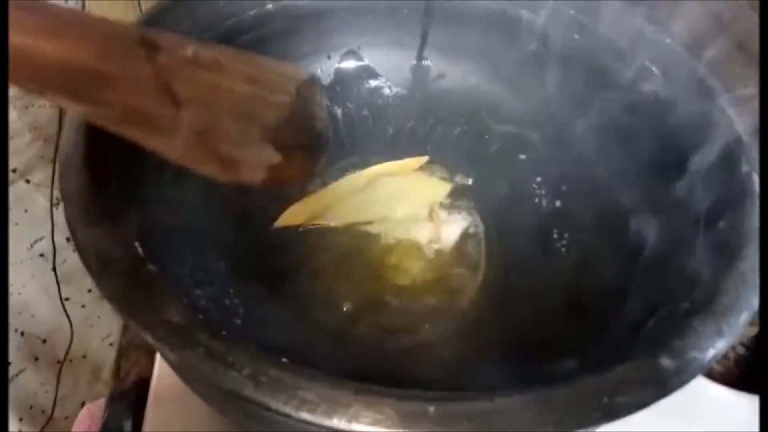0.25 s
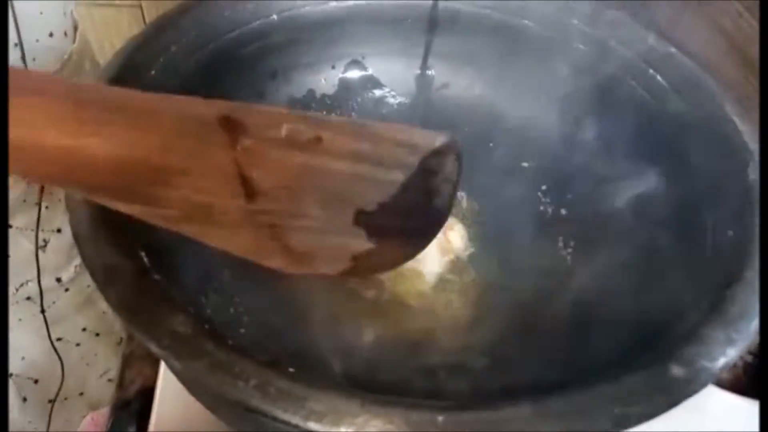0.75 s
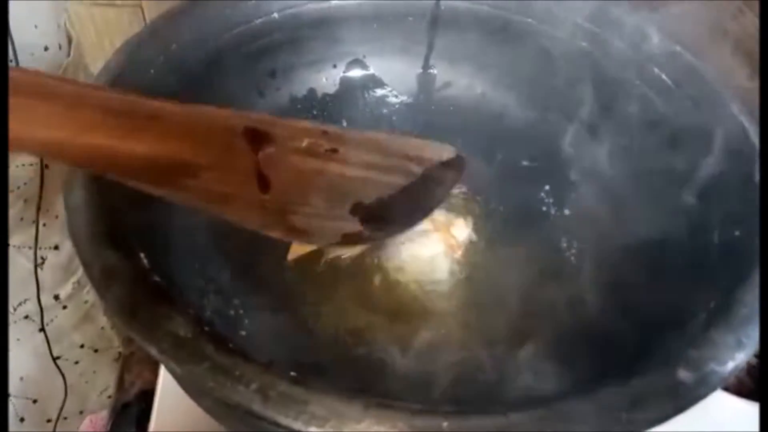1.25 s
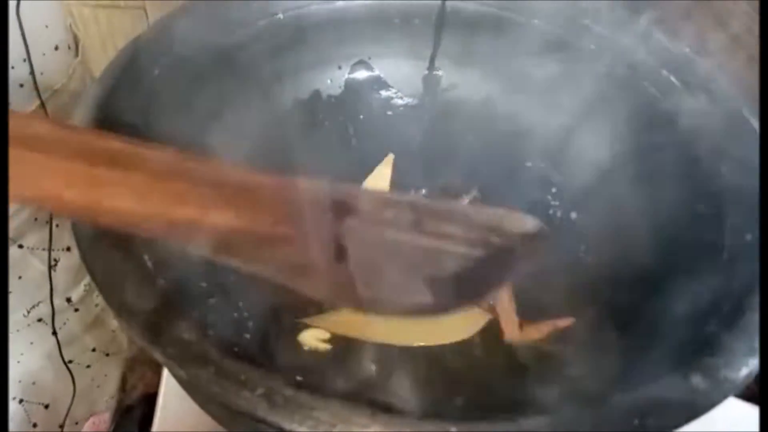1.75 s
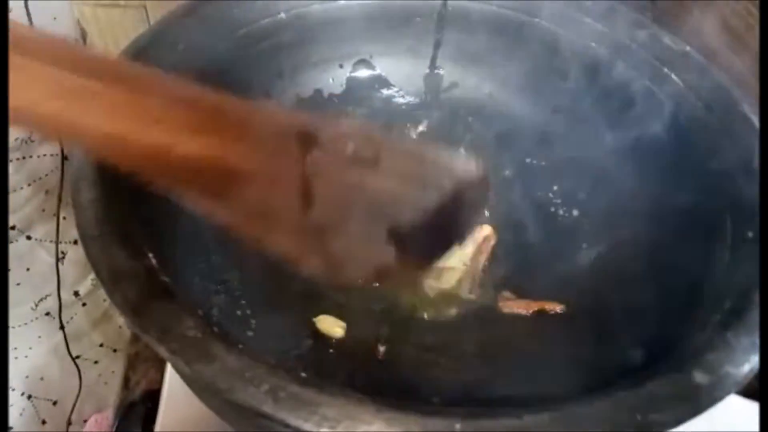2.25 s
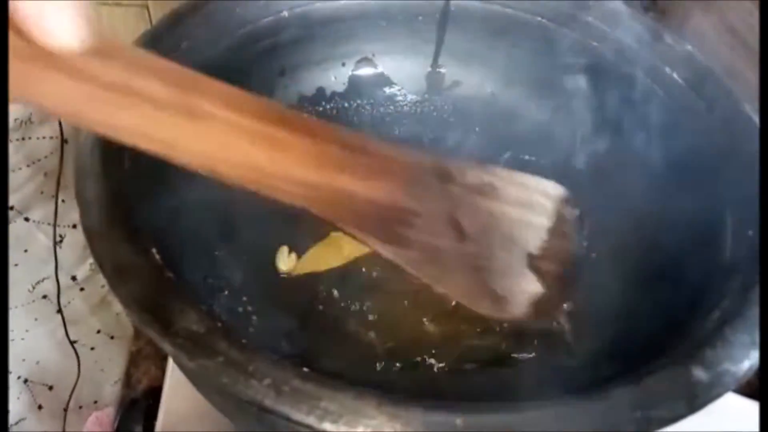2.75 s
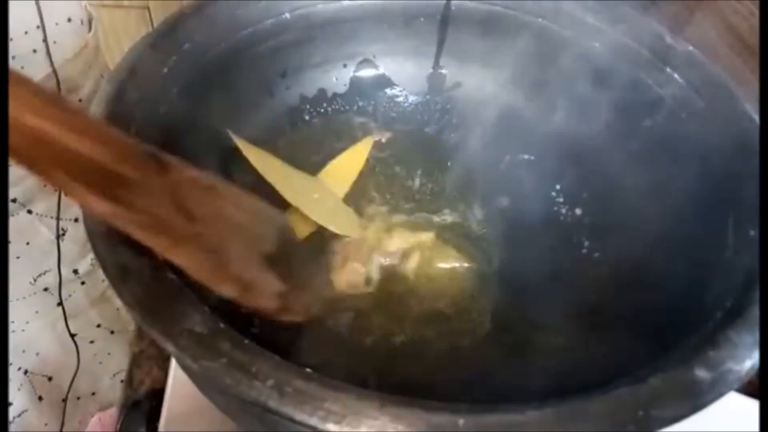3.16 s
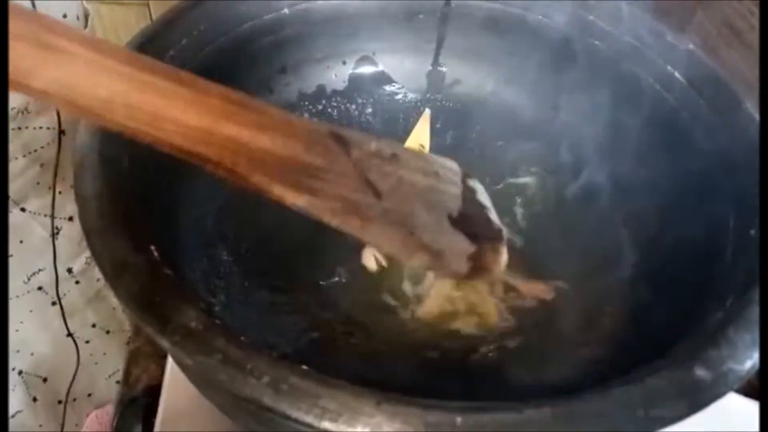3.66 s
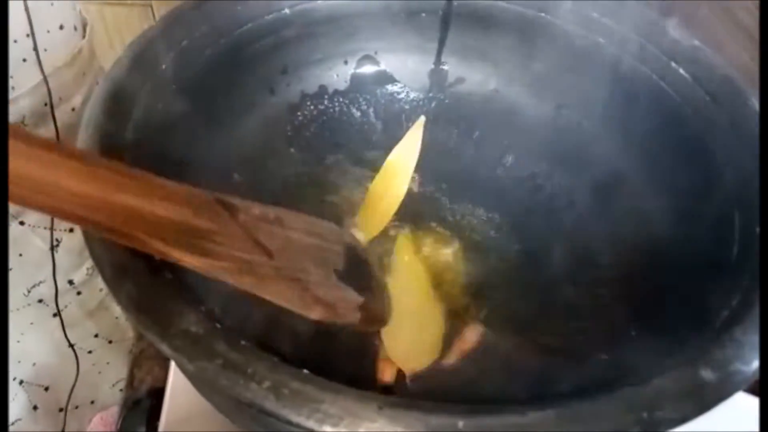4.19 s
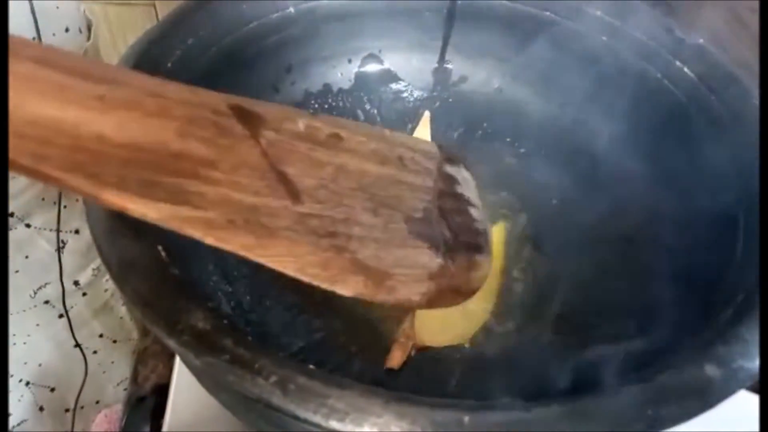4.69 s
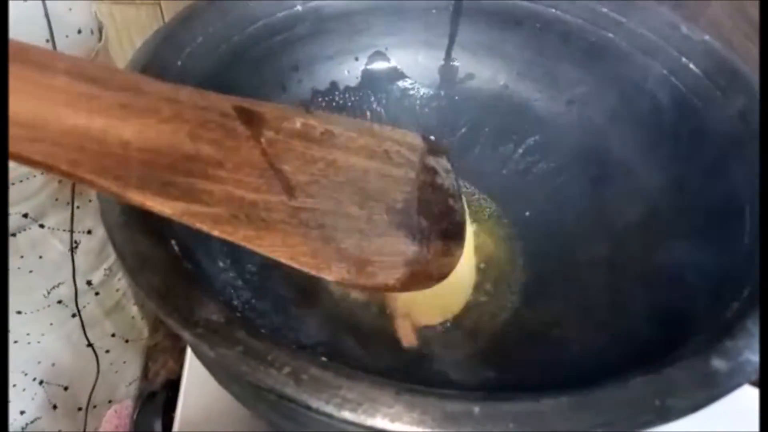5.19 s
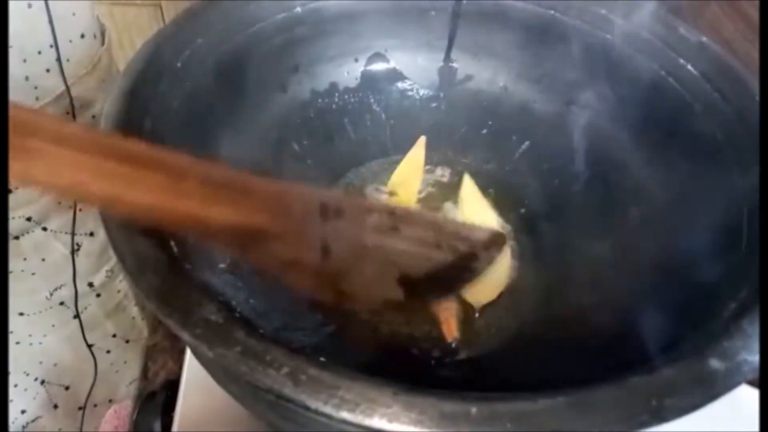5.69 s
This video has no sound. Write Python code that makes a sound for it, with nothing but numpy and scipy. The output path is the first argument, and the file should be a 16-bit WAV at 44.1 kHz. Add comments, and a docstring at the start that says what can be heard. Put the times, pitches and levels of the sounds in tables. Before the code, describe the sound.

Hot oil pops and spits over a fine sizzle as a wooden spatula stirs whole spices in a clay pot, heard up close.

```python
"""Spices frying in a clay pot

Whole spices fry in hot oil, heard from close above by two microphone ports. Steam bubbles burst in pitched
pops that bounce between the pot walls and die away in the kitchen. A wooden spatula knocks and scrapes
on the clay. A fine sizzle and a low rumble lie underneath; gain control ducks around loud pops."""
import sys
import numpy as np
from scipy import signal
from scipy.fft import rfft, irfft, next_fast_len
from scipy.io import wavfile
from scipy.ndimage import uniform_filter1d

SR = 44100
rng = np.random.default_rng(int(sys.argv[2]) if len(sys.argv) > 2 else 0)


def dump_mix(stems):
    """Bounce the given channels to the path in sys.argv[1] as a 16-bit WAV at rate SR."""
    frames = np.atleast_2d(stems).T  # one column per channel
    limited = np.clip(frames, -1, 1)  # hard clip at full scale
    pcm = np.round(limited * 32767).astype(np.int16)
    wavfile.write(sys.argv[1], SR, pcm)


N = 261733

# Loud steam bubbles. Each row: start in seconds, level in dB, pitch in Hz, snap in dB.
# Snap drives the bright edge above 11 kHz; more snap is a drier burst.
LOUD_POPS = [(0.0024, -14, 2730, -34.5), (0.0392, -9, 2860, -71), (0.0675, -11.5, 3740, -60),
             (0.0824, -12, 1390, -48), (0.112, -18.5, 4220, -45), (0.186, -15, 2650, -38),
             (0.199, -13.5, 4060, -39), (0.2515, -11.5, 3550, -58), (0.2732, -10, 2870, -57),
             (0.319, -21, 3970, -21), (0.3707, -15.5, 4150, -23), (0.4535, -18, 3670, -25),
             (0.4606, -13, 1580, -43), (0.527, -25, 1520, -41), (0.536, -17.5, 4180, -53),
             (0.5785, -13, 4030, -58), (0.695, -14, 4160, -84), (0.703, -13.5, 3210, -75),
             (0.736, -14.5, 2820, -36), (0.9869, -18.5, 5100, -36), (1.129, -11, 3340, -75),
             (1.1927, -11.5, 3200, -25.5), (1.2529, -17, 3440, -24), (1.271, -16, 3930, -49),
             (1.3025, -16.5, 3680, -61), (1.3928, -14, 3960, -65), (1.431, -21.5, 2870, -56),
             (1.4622, -9, 3380, -76), (1.493, -15.5, 2390, -76), (1.5308, -6, 2195, -76),
             (1.6567, -19, 2260, -46), (1.7117, -21.5, 4100, -44), (1.7396, -12.5, 3480, -44),
             (1.7633, -20, 4160, -40), (1.8833, -19.5, 2670, -38), (1.9053, -10.5, 3600, -65),
             (1.9651, -22, 5170, -45), (2.079, -10.5, 2880, -51), (2.1057, -14.5, 4300, -29),
             (2.2256, -16.5, 3160, -28), (2.2895, -13, 4350, -50), (2.299, -21.5, 4180, -28),
             (2.348, -11, 4000, -71), (2.364, -17.5, 4050, -32), (2.3922, -20, 1800, -47),
             (2.43, -15, 4440, -46), (2.5015, -15, 4340, -38), (2.5595, -12.5, 3450, -68),
             (2.587, -23.5, 2440, -48), (2.655, -19, 4170, -49), (2.684, -17.5, 4020, -41),
             (2.7023, -21.5, 3780, -32), (2.7419, -23.5, 3940, -19.5), (2.8455, -17, 4340, -34),
             (2.855, -14, 3570, -27), (2.865, -18.5, 3880, -26), (2.946, -12, 4420, -78),
             (2.9697, -24.5, 5000, -36), (2.99, -14.5, 4640, -45), (3.052, -21.5, 3840, -39),
             (3.0768, -14.5, 4200, -28), (3.1005, -15, 2980, -34), (3.157, -22, 2070, -53),
             (3.199, -19.5, 2180, -40), (3.2986, -14, 2500, -44), (3.4017, -17.5, 4890, -39),
             (3.453, -11, 2810, -26), (3.472, -19, 3200, -40), (3.4835, -15, 4330, -22.5),
             (3.515, -20, 3330, -39), (3.575, -18, 4670, -28), (3.603, -10.5, 2670, -41),
             (3.6818, -13.5, 3930, -53), (3.706, -10.5, 3180, -56), (3.7574, -21, 4350, -40),
             (3.813, -8, 1740, -100), (3.8452, -13.5, 3670, -64), (3.8585, -11.5, 3870, -41),
             (4.0478, -21, 1450, -34), (4.0784, -15.5, 4000, -19.5), (4.1937, -7.5, 1390, -43),
             (4.239, -8.5, 3920, -43), (4.2731, -11.5, 2600, -59), (4.3098, -17.5, 3630, -66),
             (4.339, -18, 2600, -34), (4.391, -23.5, 3050, -45), (4.4424, -22, 3000, -52),
             (4.514, -13.5, 1550, -43), (4.6133, -13, 4130, -20), (4.8804, -16, 3830, -77),
             (4.9485, -13.5, 4020, -39.5), (5.2752, -14.5, 3530, -45), (5.3355, -17, 3550, -47),
             (5.4083, -13.5, 2880, -47), (5.4453, -17, 3840, -72), (5.492, -26.5, 4280, -45),
             (5.5421, -15.5, 3630, -59), (5.6313, -12, 1840, -43), (5.65, -11, 3380, -52),
             (5.6689, -9, 2430, -91), (5.7195, -10, 2900, -49), (5.8645, -38, 2500, -10)]
# Dry oil spits, one sharp spike each. Each row: start in seconds, level in dB, pitch in Hz, snap in dB.
OIL_SPITS = [(0.4801, -13, 4260, -26), (1.368, -16.5, 4710, -58), (1.841, -15, 4530, -33.5),
             (1.9883, -19, 4200, -22.5), (2.1607, -10, 3700, -32.5), (2.6279, -17, 3860, -23.5),
             (2.7935, -17, 4180, -83), (4.0072, -23.5, 4170, -21), (4.721, -13, 3880, -98),
             (5.924, -28, 3970, -19.5)]
# Steam whistling out of a spice. Each row: start in seconds, length in seconds, pitch in Hz, level in dB.
STEAM_JETS = [(0.268, 0.047, 3000, -22.5), (1.532, 0.125, 2100, -29.5), (3.836, 0.062, 3980, -24.5),
              (4.276, 0.11, 2680, -31.5), (4.515, 0.034, 2170, -24), (5.682, 0.14, 2660, -30.5)]
# Spatula and spices hitting the pot. Each row: start in seconds, level in dB, relative clay drive in dB.
POT_KNOCKS = [(0.081, -21.5, -32), (0.462, -21, -37), (1.658, -16, -34), (1.763, -23.5, -27),
              (2.386, -25.5, -30.5), (2.561, -15.5, -18.5), (2.673, -8, -36.5), (3.156, -14, -29.5),
              (3.201, -17.5, -36), (3.813, -20.5, -42), (4.049, -19, -44), (4.194, -14.5, -34.5),
              (4.434, -23, -30), (4.513, -18, -36), (5.631, -23.5, -33)]
# Modes of the pot. Each row: frequency in Hz, gain in dB, T60 in seconds.
CLAY_MODES = [(242, 4, .2), (412, 7, 0.094), (650, 11, 0.17), (1134, 0, 0.06)]
# Spatula dragging spices over clay. Each row: start in seconds, length in seconds, level in dB.
SPATULA_STROKES = [(3.102, .11, -29.5), (4.415, 0.043, -35), (4.778, .03, -29)]
# Envelope of the tiny bubbles. Each row: time in seconds, fizz level in dB, spray level in dB.
SIZZLE_LEVELS = [(0.0, -39, -73), (0.51, -39, -56.5), (1.02, -44.5, -72.5), (1.37, -56.5, -65),
                 (1.67, -39, -86), (1.96, -40, -61), (3.48, -46.5, -75), (3.57, -41, -58.5),
                 (4.31, -38, -67.5), (5.17, -53.5, -76), (5.55, -45, -90), (5.93, -51, -70)]
# Flame and house rumble. Each row: frequency in Hz, relative spectral density in dB.
RUMBLE_SPECTRUM = [(30, -16), (130, 8.5), (300, -10.5), (780, -23), (1500, -35)]
# Rumble envelope. Each row: time in seconds, gain in dB.
RUMBLE_GAINS = [(0, -55.5), (4, -54), (5.2, -49.5), (5.93, -48.5)]
# Wavering hums. Each row: frequency in Hz, width in Hz, level in dB re the rumble noise.
RUMBLE_HUMS = [(157.1, 9.6, -7.5), (410, 63, -9.5), (645, 48, -15.5)]
# Right port response. Each row: frequency in Hz, gain in dB re the left port.
RIGHT_PORT_EQ = [(140, -8.5), (310, -2), (600, -6.5), (1000, -4.5), (1450, -7.5), (2500, -10.5),
                 (3500, -8.5), (5000, -4), (7500, 1), (11000, -1), (14500, -6)]

ECHO_SAMPLES = 1500
REFERENCE_SNAP_DB = -21


def pops():
    """Bursting bubbles and oil spits with their wall bounces; returns body and bright snap."""
    body, snap = np.zeros((2, 2, N + ECHO_SAMPLES))
    click = np.zeros((2, ECHO_SAMPLES))
    click[:, 0] = 1
    for row in OIL_SPITS + LOUD_POPS + small_pops():
        start_s, level_db, hz, snap_db = row
        at = round(start_s * SR)
        dryness_db = snap_db - REFERENCE_SNAP_DB
        bounce_db = -4 if row in OIL_SPITS else 4 - 0.11 * dryness_db
        echoes = wall_echoes(per_s=6000, t60_s=0.032, bounce_db=bounce_db)
        body[:, at:at + ECHO_SAMPLES] += amp(level_db) * bubble_burst(echoes, hz, dryness_db)
        edge = amp(level_db + snap_db) * (click + amp(-8.5) * (echoes - click))
        edge[1] = np.roll(edge[1], rng.integers(0, 5))   # own place between the ports
        snap[:, at:at + ECHO_SAMPLES] += edge
    pot_air = amp(1.5) * band(body[:, :N], 521, 720, order=4)
    body = amp(7.5) * band(body[:, :N], 1200, 8800, order=5)
    snap = amp(30.5) * band(snap[:, :N], 11060, 21000)
    droplets = amp(-8.5) * kitchen_tail(snap, t60_s=0.28, cutoff_hz=15000)
    return body + pot_air, snap + droplets


def bubble_burst(echoes, hz, dryness_db, energy_s=0.0006):
    """A short ring, a broad crack and an unpitched spike, at fixed energy. Wet bursts ring narrower."""
    width_hz = (hz / 5 + 260) * amp(0.027 * dryness_db)
    ring = unit_peak(resonate_twice(echoes, hz, width_hz))
    crack = amp(2 + 0.49 * dryness_db) * unit_peak(resonate_twice(echoes, 1.423 * hz, 0.5 * hz))
    spike = amp(-7.5 + 0.18 * dryness_db) * unit_peak(resonate_twice(echoes, hz=3200, width_hz=2450))
    return unit_energy(unit_peak(ring + crack) + spike) * np.sqrt(energy_s * SR)


def small_pops(per_s=48, centre_hz=3730, spread_octaves=0.38):
    """Random rows for small bubbles; their level follows the sizzle."""
    starts_s = np.cumsum(rng.exponential(1, 800)) / per_s
    inside = starts_s < N / SR
    level_draw, pitch_draw, snap_draw = rng.standard_normal((800, 3))[inside].T
    starts_s = starts_s[inside]
    fizz_db = envelopes(SIZZLE_LEVELS)[0]
    level_db = fizz_db[(starts_s * SR).astype(int)] + 11 + 3 * level_draw
    hz = np.clip(centre_hz * 2 ** (spread_octaves * pitch_draw), 1500, 6500)
    snap_db = -44 + 4 * snap_draw
    return list(zip(starts_s, level_db, hz, snap_db))


def steam_jets(fade_db=6):
    """Sputtering noise in one resonance, fading as the steam runs out."""
    out, t = np.zeros((2, N)), np.arange(N) / SR
    for start_s, length_s, hz, level_db in STEAM_JETS:
        span = (t > start_s) & (t < start_s + length_s)
        sputter = rng.standard_normal((2, span.sum())) * amp(4.1 * rng.standard_normal(span.sum()))
        whistle = unit_rms(resonate_twice(sputter, hz, hz / 5.5))
        out[:, span] += amp(level_db - fade_db * (t[span] - start_s) / length_s) * whistle
    return out


def knocks():
    """Dull pushes sound the pot's two lowest air resonances and faintly ring the clay."""
    push, blows = np.zeros((2, 2, N + ECHO_SAMPLES))
    for start_s, level_db, clay_db in POT_KNOCKS:
        at = round(start_s * SR)
        chatter = amp(level_db) * wall_echoes(per_s=1600, t60_s=0.053, bounce_db=-2.5)
        push[:, at:at + ECHO_SAMPLES] += 0.5 * (chatter + chatter[0])
        blows[:, at:at + ECHO_SAMPLES] += amp(clay_db) * chatter[0]
    air = resonate(push, hz=612, width_hz=264) - amp(-0.5) * resonate(push, hz=1290, width_hz=630)
    clay = sum((-1) ** k * amp(db) * resonate(blows, hz, np.log(1000) / np.pi / t60_s)
               for k, (hz, db, t60_s) in enumerate(CLAY_MODES))
    dulled = signal.lfilter([0.3], [1, -0.7], air + clay)
    return band(dulled[:, :N], 328, 3000)


def scrapes(grit_per_s=2500):
    """Dense, uneven grit clicks while the spatula slides."""
    t = np.arange(N) / SR
    strokes = sum(amp(level_db) * ((t > start_s) & (t < start_s + length_s))
                  for start_s, length_s, level_db in SPATULA_STROKES)
    grit = rng.standard_normal((2, N)) * (rng.random(N) < grit_per_s / SR)
    return unit_rms(band(grit, 1500, 4240)) * strokes


def sizzle(median_per_s=2500, hiss_db=-47.5):
    """Tiny bursts in bunches drive 12 resonators; thin spray above, even oil hiss below."""
    fizz_db, spray_db = envelopes(SIZZLE_LEVELS)
    bursts_per_s = median_per_s * amp(7.6 * drift(rate_hz=26))
    sizes = amp(3.1 * np.minimum(rng.exponential(1, (2, N)), 5)) * rng.choice([-1, 1], (2, N))
    clicks = sizes * (rng.random((2, N)) < bursts_per_s / SR)
    resonator = rng.integers(0, 12, (2, N))
    fizz = sum(resonate(clicks * (resonator == k), hz, hz / 0.49)
               for k, hz in enumerate(np.geomspace(1300, 5200, 12)))
    fizz = amp(fizz_db) * unit_rms(port_rolloff(band(fizz, 2150, 10000)))
    spray = amp(spray_db) * unit_rms(band(clicks, 5400, 21000, order=3))
    hiss = resonate_twice(rng.standard_normal((2, N)), hz=2600, width_hz=1270)
    return fizz + spray + amp(hiss_db) * unit_rms(port_rolloff(hiss))


def rumble(common_waver_db=3.2, own_waver_db=3):
    """Flame and house: wavering third-octave noise bands and hums, nearly alike at both ports."""
    edges_hz = 25 * 2 ** np.arange(0, 5.6, 1 / 3)
    spectrum_hz, spectrum_db = np.transpose(RUMBLE_SPECTRUM)
    white = rng.standard_normal((2, 2, N))
    common_db = common_waver_db * drift(rate_hz=3.6)
    noise = hums = 0
    for k, (low_hz, high_hz) in enumerate(zip(edges_hz, edges_hz[1:])):
        level_db = np.interp(np.log(low_hz * high_hz) / 2, np.log(spectrum_hz), spectrum_db)
        gain = amp(level_db + common_db + own_waver_db * drift(rate_hz=6.2))
        noise += gain * band(white[k % 2], low_hz, high_hz)
    for hz, width_hz, level_db in RUMBLE_HUMS:
        gain = amp(level_db + own_waver_db * drift(rate_hz=3))
        hums += gain * unit_rms(resonate_twice(rng.standard_normal((2, N)), hz, width_hz))
    mix = unit_rms(noise) + hums
    mid, side = mix / mix[0].std() * np.sqrt(2)
    return (mid + amp(-12) * side * [[1], [-1]]) * amp(envelopes(RUMBLE_GAINS)[0])


def wall_echoes(per_s, t60_s, bounce_db):
    """A unit click, then random pot-wall bounces per port with total energy bounce_db."""
    t = np.arange(ECHO_SAMPLES) / SR
    bounces = (rng.random((2, ECHO_SAMPLES)) < per_s / SR) * rng.standard_normal((2, ECHO_SAMPLES))
    decay = amp(-60 * t / t60_s) * (t > 0.0006)
    echoes = amp(bounce_db) * unit_energy(bounces * decay)
    echoes[:, 0] = 1
    return echoes


def kitchen_tail(x, t60_s=0.29, cutoff_hz=5000, onset_s=0.0013):
    """Diffuse reverberation: decaying noise, independent at each port."""
    t = np.arange(SR // 2) / SR
    tail = rng.standard_normal((2, len(t))) * amp(-60 * t / t60_s) * np.clip(t / onset_s, 0, 1)
    tail = signal.lfilter(*signal.butter(1, cutoff_hz, fs=SR), tail)
    return signal.fftconvolve(x, unit_energy(tail), axes=-1)[:, :N]


def port_rolloff(x, cutoff_hz=5900):
    """The ports fall off steeply above their resonance."""
    return signal.sosfilt(signal.butter(8, cutoff_hz, fs=SR, output="sos"), x)


def microphone_ports(left, right, left_lag_samples=2):
    """The left port is slightly farther from the oil; the right has its own colour."""
    size = next_fast_len(N + SR // 10)
    bins_hz = np.arange(size // 2 + 1) * SR / size
    eq_hz, eq_db = np.transpose(RIGHT_PORT_EQ)
    colour = amp(np.interp(np.log(bins_hz + 1), np.log(eq_hz), eq_db))
    delayed = np.pad(left, (left_lag_samples, 0), "edge")
    coloured = irfft(rfft(right, size) * colour, size)
    return np.array([delayed[:N], coloured[:N]])


def drift(rate_hz):
    """Smooth random motion, RMS about 1."""
    pole = np.exp(-80 * np.pi * rate_hz / SR)   # one step per 40 samples
    slow = signal.lfilter([1], [1, -2 * pole, pole * pole], rng.standard_normal(N // 40 + 2002))[2000:]
    return np.interp(np.arange(N) / 40, np.arange(len(slow)), unit_rms(slow))


def resonate(x, hz, width_hz):
    """Two-pole resonance."""
    r, w = np.exp(-np.pi * width_hz / SR), 2 * np.pi * hz / SR
    return signal.lfilter([0, np.sin(w)], [1, -2 * r * np.cos(w), r * r], x + 1e-18)


def resonate_twice(x, hz, width_hz):
    """Steeper flanks: a click becomes a round plop."""
    return resonate(resonate(x, hz, width_hz), hz, width_hz)


def band(x, low_hz, high_hz, order=2):
    return signal.sosfilt(signal.butter(order, [low_hz, high_hz], "band", fs=SR, output="sos"), x + 1e-18)


def envelopes(rows):
    times_s, *columns = np.transpose(rows)
    return [np.interp(np.arange(N) / SR, times_s, column) for column in columns]


def amp(db):
    return 10 ** (np.asarray(db) / 20)


def unit_rms(x):
    return x / np.sqrt(np.mean(x ** 2) + 1e-20)


def unit_peak(x):
    return x / np.abs(x[0]).max()


def unit_energy(x):
    return x / np.sqrt(np.sum(x ** 2, axis=1, keepdims=True) + 1e-12)


def scene():
    """Pot, kitchen tail, sizzle and rumble at the two ports."""
    body, snap = pops()
    pot = body + knocks() + steam_jets() + scrapes()
    bright = signal.lfilter(*signal.butter(2, 1950, "high", fs=SR), pot)   # walls return mostly treble
    pot_in_room = port_rolloff(pot + amp(-11.5) * kitchen_tail(bright))
    return microphone_ports(*(pot_in_room + snap + sizzle() + rumble()))


def record(dry, knee_db=-30, slope=0.22, release_db_per_s=60, lookahead_s=0.0044, cutoff_hz=16500):
    """Look-ahead gain control ducks a share of the level over the knee; a steep low-pass follows."""
    samples = np.arange(N)
    level_db = 10 * np.log10(uniform_filter1d(np.mean(dry ** 2, axis=0), size=200) + 1e-12)
    target_db = slope * np.maximum(level_db - knee_db, 0)
    release_db = release_db_per_s * samples / SR
    duck_db = np.maximum.accumulate(target_db + release_db) - release_db
    duck_db = signal.lfilter([0.01], [1, -0.99], duck_db)   # soften the attack
    duck_db = np.interp(samples + lookahead_s * SR, samples, duck_db)
    return signal.sosfilt(signal.cheby2(12, 70, cutoff_hz, fs=SR, output="sos"), dry * amp(-duck_db))


dry = scene()
out = record(dry)
dump_mix(out)
```